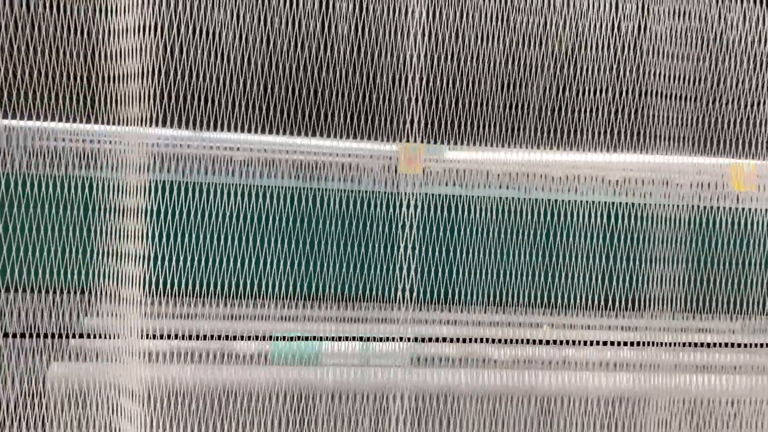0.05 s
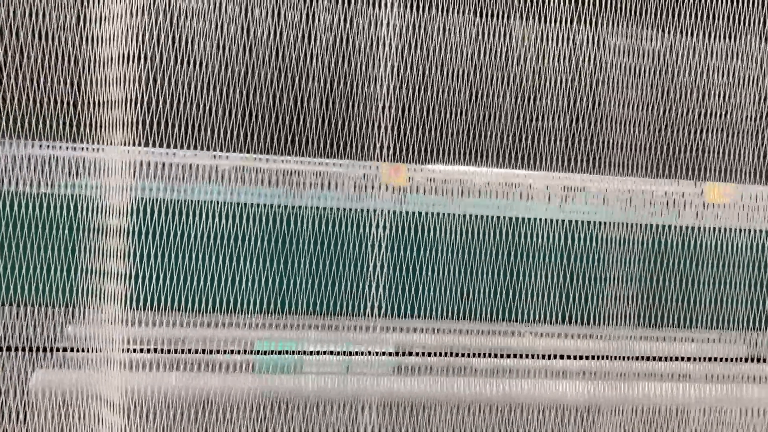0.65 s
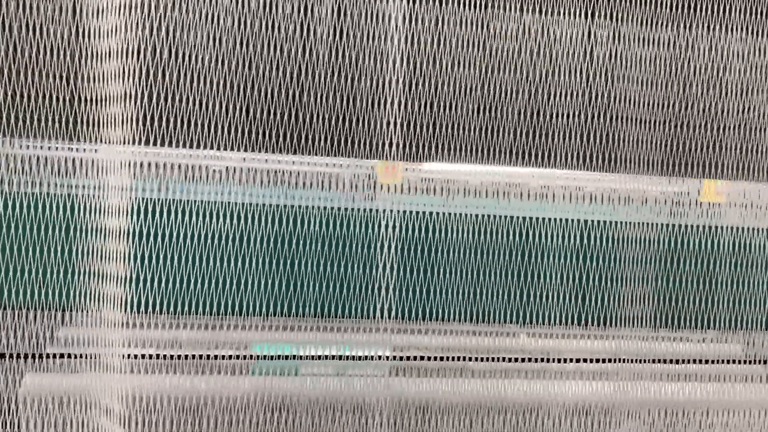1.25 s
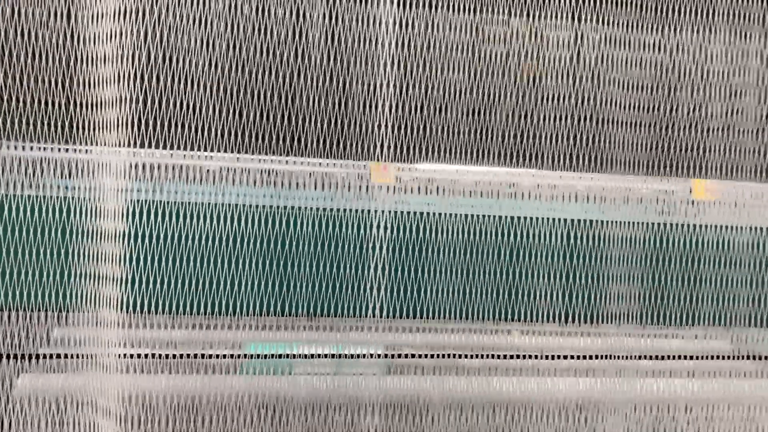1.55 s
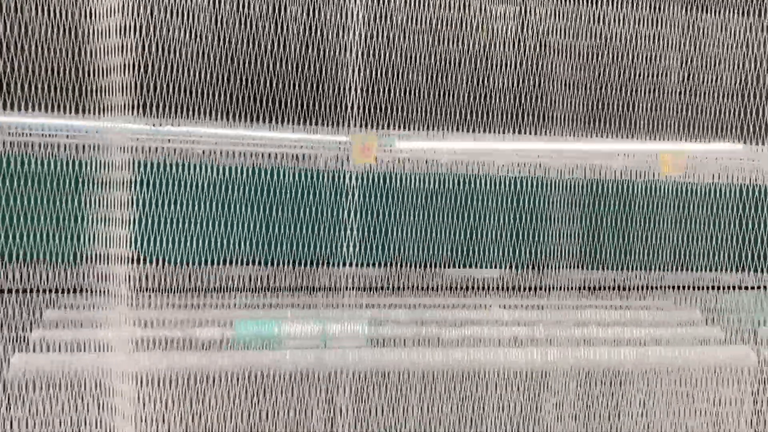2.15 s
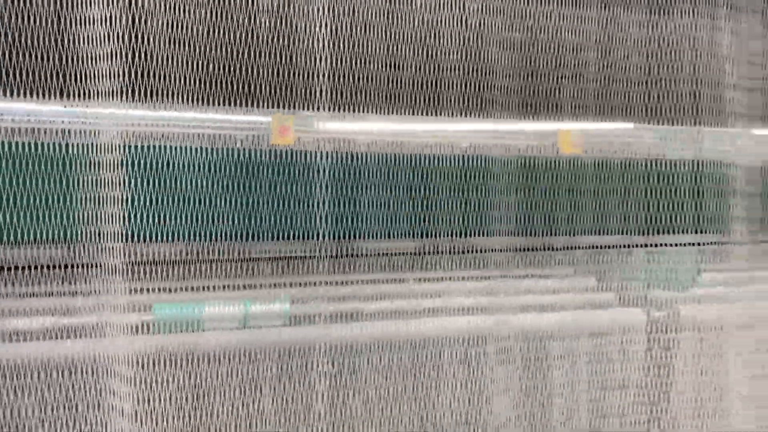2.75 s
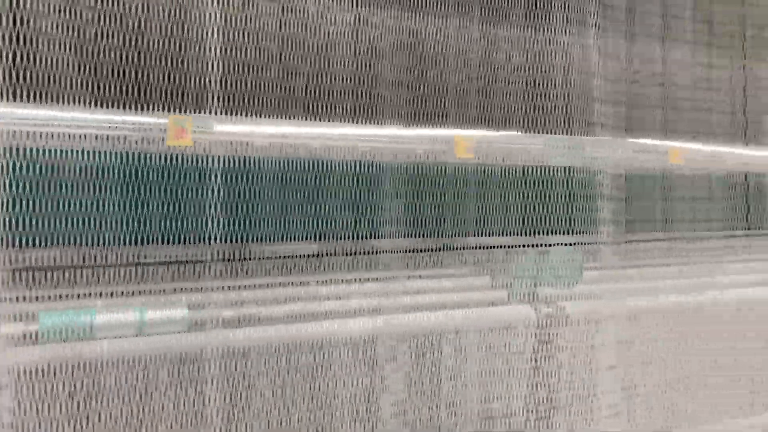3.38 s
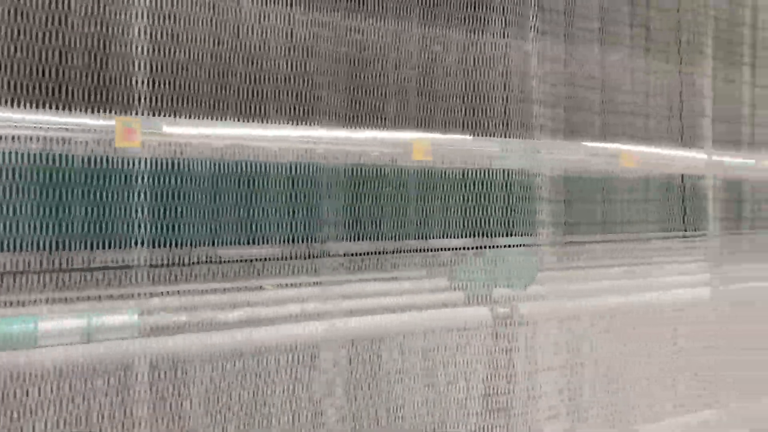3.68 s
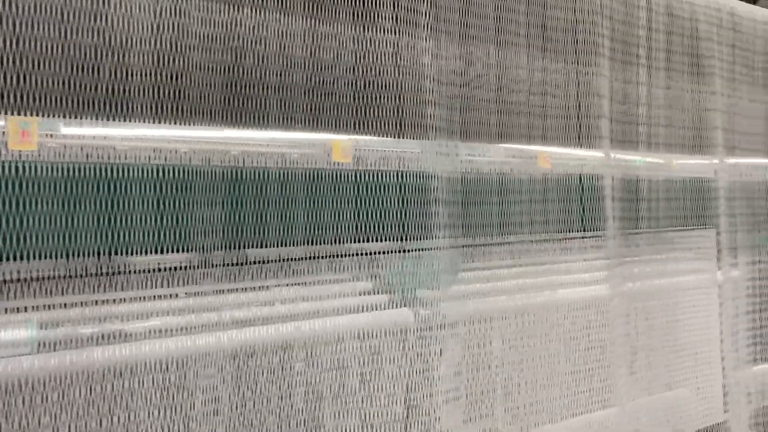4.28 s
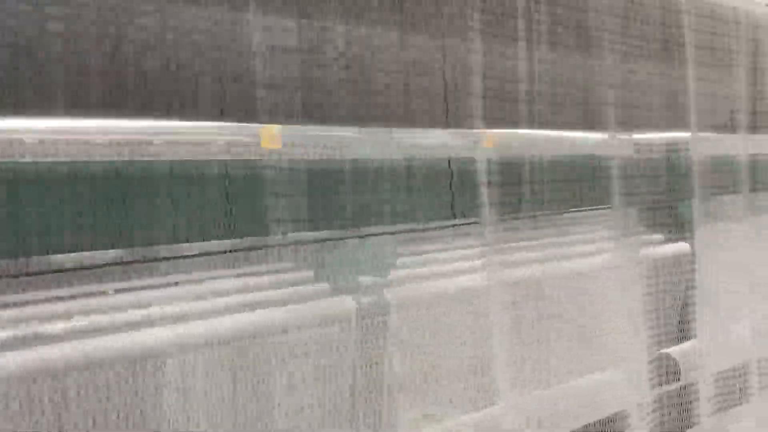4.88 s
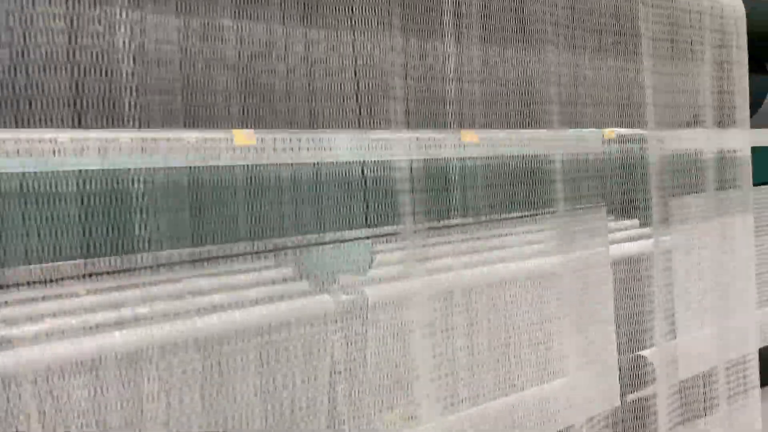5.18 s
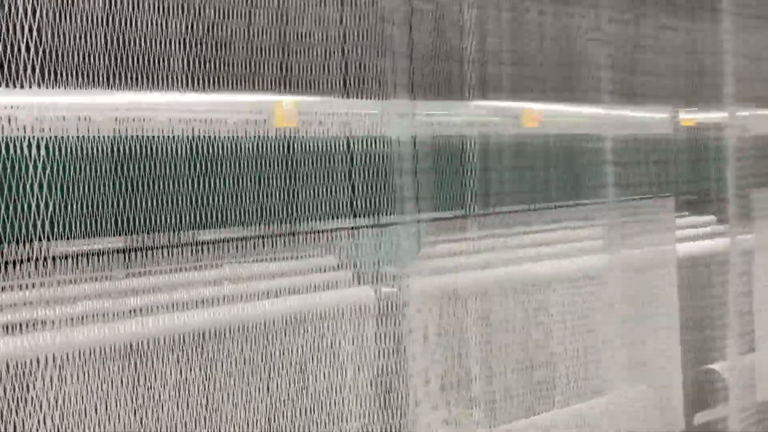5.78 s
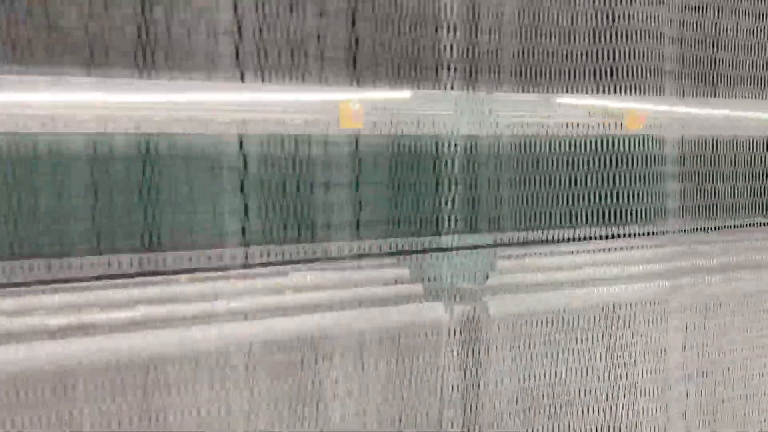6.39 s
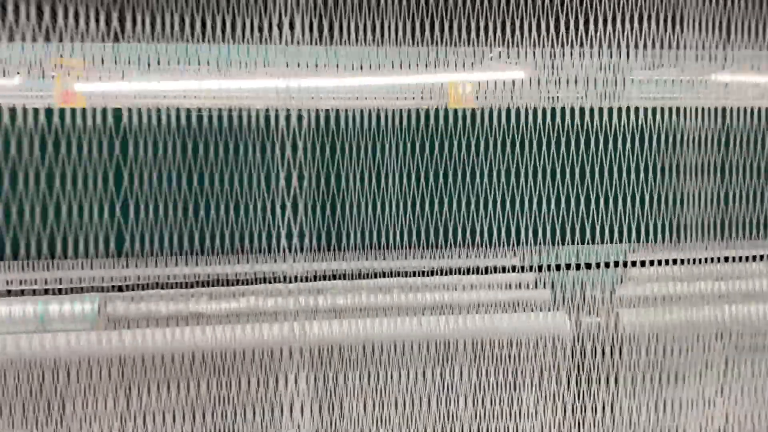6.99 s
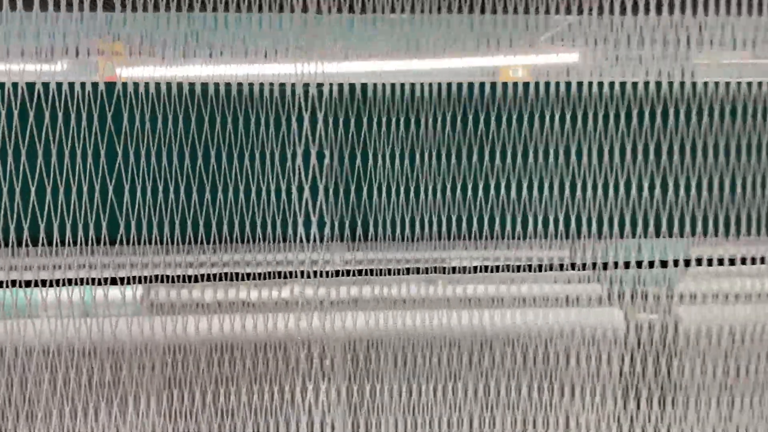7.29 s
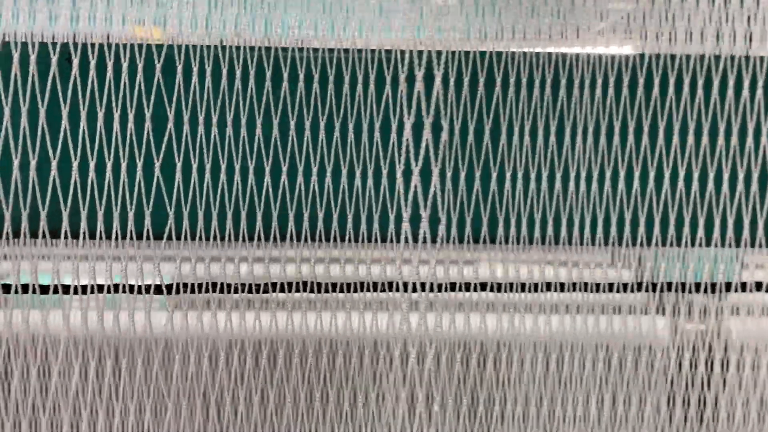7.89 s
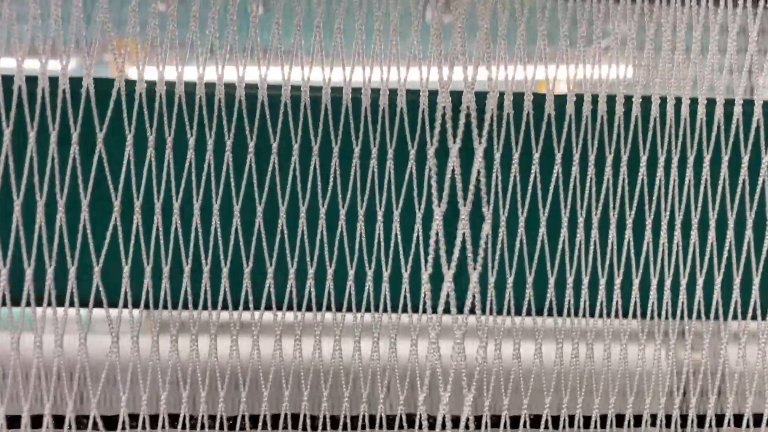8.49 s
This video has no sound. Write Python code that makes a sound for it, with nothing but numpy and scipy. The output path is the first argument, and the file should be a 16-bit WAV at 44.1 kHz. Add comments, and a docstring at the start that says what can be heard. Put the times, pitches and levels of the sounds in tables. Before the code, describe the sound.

A net-making machine clacks, ticks and thumps about three times a second over a dense factory roar with distant booms.

```python
"""In a factory hall, a wide net-making machine close by turns about three times a second.
In every turn latches tick, threads swish, bobbins chink, bars knock, a row of shuttles clacks home
and the frame thumps the floor. Now and then a dry guide scrapes or squeaks, or a loose part clinks.
Other machines roar all around, and heavy blows boom through the hall, some setting panels droning."""
import sys
import numpy as np
from scipy import signal
from scipy.fft import rfft, irfft, next_fast_len
from scipy.io import wavfile
from scipy.ndimage import map_coordinates

SR = 44100
rng = np.random.default_rng(int(sys.argv[2]) if len(sys.argv) > 2 else 0)


def int16_out(signal):
    """Quantize to a 16-bit WAV file."""
    q = np.round(np.clip(np.atleast_2d(signal).T, -1, 1) * 32767)
    wavfile.write(sys.argv[1], SR, q.astype(np.int16))


N = 385434
TIME = np.arange(N) / SR
TURN_S = .324637  # one turn of the crank


def amp(db):
    """Turn decibels into a gain."""
    return 10 ** (np.asarray(db) / 20)


def unit(x):
    """Scale a sound to an average (rms) level of 1."""
    return x / np.sqrt(np.mean(x ** 2) + 1e-20)


def along(points, hz):
    """Read (Hz, value) points at any frequency, on a log scale."""
    f, v = np.transpose(points)
    return np.interp(np.log(hz + 1), np.log(f + 1), v)


def curve(points):
    """Join (seconds, value) points with straight lines."""
    return np.interp(TIME, *np.transpose(points))


def wobble(rate):
    """A smooth random curve through `rate` points a second."""
    return map_coordinates(rng.standard_normal(int(N * rate / SR) + 4), [TIME * rate])


def filtered(x, response):
    """Give each frequency in x the gain response(hz)."""
    size = next_fast_len(N + 8192)
    return irfft(rfft(x, size) * response(np.fft.rfftfreq(size, 1 / SR)), size)[..., :N]


def rush(spectrum):
    """Noise from all around, nearly the same left and right in the bass."""
    # Each row: frequency in Hz, how alike the two sides are (1 is identical).
    likeness = [(60, 0.91), (130, 1), (290, 0.56), (640, 0.037), (1400, -0.16), (2300, 0.4), (4000, 0.78),
                (7000, 0.74)]
    angle = lambda hz: np.arccos(np.clip(along(likeness, hz), -1, 1)) / 2
    colour = lambda hz: amp(along(spectrum, hz)) * np.array([np.cos(angle(hz)), np.sin(angle(hz))])
    mid, side = filtered(rng.standard_normal((2, N)), colour)
    return unit(np.array([mid + side, mid - side]))


def nearby(spectrum, direct, sizes=1, left_lag_s=.00027):
    """Close noise: the direct share reaches the right side first, the rest is scattered."""
    noise = sizes * rng.standard_normal((3, N))
    common, *scattered = filtered(noise, lambda hz: amp(along(spectrum, hz)))
    straight = np.array([np.roll(common, round(left_lag_s * SR)), common])
    return unit(np.sqrt(direct) * straight + np.sqrt(1 - direct) * np.array(scattered))


def narrow(modes, width_hz):
    """Stereo noise that rings around the given (Hz, dB) pitches."""
    shape = lambda f: sum(amp(db) / (1 + ((f - hz) / width_hz) ** 2) for hz, db in modes)
    return unit(filtered(rng.standard_normal((2, N)), shape))


def contacts(spectrum, rate, spread_db, direct):
    """A shower of tiny, uneven impacts, about `rate` a second."""
    hits = rng.random(N) < rate / SR
    sizes = amp(spread_db * rng.standard_normal(N).clip(-2, 2))
    return nearby(spectrum, direct, hits * sizes)


def fade(t, t60):
    """Die away by 60 dB in t60 seconds, the fade time."""
    return np.exp(-np.log(1000) * t / t60)


def blows(rows, attack):
    """The loudness over time of (start, dB, fade time) blows, each rising in about `attack` seconds."""
    power = np.zeros(N)
    for s, db, t60 in rows:
        span = slice(*np.searchsorted(TIME, [s, s + t60]))
        t = TIME[span] - s
        power[span] += (amp(db) * fade(t, t60) * (1 - np.exp(-t / attack))) ** 2
    return np.sqrt(power)


def ping(s, db, t60, hz, attack):
    """One struck note: a sine that rises quickly and dies away."""
    return blows([(s, db, t60)], attack) * np.sin(2 * np.pi * hz * (TIME - s))


def turns(first_s=.0837, quicken_s=.0000656):
    """The time of each turn's stroke, when the shuttles land; the crank speeds up very slightly."""
    k = np.arange(-1, TIME[-1] / TURN_S + 1)
    return first_s + k * TURN_S - quicken_s * k ** 2 / 2


def accent(rows, s):
    """The extra dB of the turn whose stroke falls at s."""
    return sum(db for when, db in rows if abs(when - s) < TURN_S / 2)


def hall(level_db=11.5):
    """Many machines blur into one roar; it and the booms ring in the hall."""
    # The roar's tone. Each row: frequency in Hz, level in dB.
    roar_tone = [(20, -47), (55, 1.5), (90, 0.5), (125, -3.5), (200, -2), (290, -4), (350, -7), (480, -6),
                 (720, -5.5), (950, -9), (1200, -13.5), (2300, -20), (4500, -24), (9000, -45), (11000, -33),
                 (16000, -26.5)]
    # Its slow rise and fall. Each row: time in seconds, level in dB.
    roar_levels = [(0, -32.5), (1.2, -33), (2.1, -32.5), (3, -32.5), (4.3, -32.5), (5.2, -33.5),
                   (5.8, -33.5), (6.6, -34.5), (7.4, -34.5), (8.2, -33), (8.74, -35)]
    # Pitches the hall favours. Each row: frequency in Hz, half width in Hz, boost in dB.
    resonances = [(138.4, 14.6, 3.5), (208, 56, 2), (302, 6.6, 1.5), (407, 20, 3.5), (481, 3.2, 5),
                  (1390, 35, 1.5), (2410, 470, 2.5)]
    drift_db = .45 * wobble(6)
    roar = amp(curve(roar_levels) + level_db + drift_db) * rush(roar_tone)
    lift = lambda f: amp(sum(db / (1 + ((f - hz) / width) ** 2) for hz, width, db in resonances))
    air = lambda f: 1 / (1 + (f / 9000) ** 4)  # distance takes the treble away
    return filtered(roar + booms(), lambda f: lift(f) * air(f))


def threads(rattle_db=11, swish_db=2, rattle_depth=.72):
    """Threads swish and bobbins rattle, swelling with the crank; the slack varies from turn to turn."""
    # Faster threads are louder. Each row: share of the turn after the stroke, level in dB.
    pull = [(.02, 3), (.14, .7), (.28, -2.3), (.48, -3.7), (.62, -.8), (.8, .8), (.92, 1.8)]
    # How near the threads sound. Each row: time in seconds, level in dB.
    nearness = [(0, -44), (2.3, -43.5), (4.2, -44.5), (6.2, -42.5), (6.4, -49.5), (6.9, -45.5), (8.74, -45)]
    # The two tones. Each row: frequency in Hz, level in dB.
    rattle_tone = [(300, -45), (1000, 5.5), (1700, 10.5), (3000, 4), (4400, -7), (5400, -1.5), (7500, -4.5),
                   (12000, -136), (16000, -55)]
    swish_tone = [(2000, -12), (4500, 1), (6500, 2), (8500, -1), (11000, 1), (12500, 0), (16000, -5)]
    crank = np.interp(TIME, turns(), np.arange(len(turns())))
    pull_db = np.interp(crank, *np.transpose(pull), period=1)
    slack_db = .7 * wobble(14)
    rattle_gain = amp(rattle_db + rattle_depth * pull_db + 2 * wobble(70))
    rattle = rattle_gain * contacts(rattle_tone, rate=4000, spread_db=0, direct=.096)
    swish = amp(swish_db + pull_db + slack_db + .81 * wobble(120)) * nearby(swish_tone, direct=1)
    return amp(curve(nearness)) * (rattle + swish)


def bobbins(level_db=-43, centre_hz=2550, spread=.22, spread_db=4.5, t60=.13, count=1200):
    """Loose steel bobbins chink at random, each at its own pitch and place."""
    when, place = rng.random((2, count))
    pitch, size = rng.standard_normal((2, count, 1)).clip(-2, 2)
    t = np.arange(SR // 20) / SR
    hz = centre_hz * np.exp(spread * pitch)
    chinks = amp(spread_db * size) * fade(t, t60) * np.sin(2 * np.pi * hz * t)
    samples = ((when * N).astype(int)[:, None] + np.arange(len(t))).ravel()
    sides = [np.bincount(samples, (pan[:, None] * chinks).ravel(), N)[:N] for pan in (place, 1 - place)]
    return amp(level_db) * unit(np.array(sides))


def latches(level_db=-41, slop_s=.001, scatter_db=1, ring_db=-10):
    """The same steel latches trip in every turn, never quite equally hard."""
    # One turn's ticks. Each row: seconds from the stroke, level in dB, fade time in seconds.
    trips = [(-.1435, 6.5, .06), (-.1205, 7, .065), (-.0905, 10.5, .05), (-.08, -2, .16), (-.022, 0, .1),
             (-.005, 2, .07), (.018, -1, .07), (.093, -1.5, .1)]
    # Harder and softer turns. Each row: time in seconds, extra dB.
    accents = [(.41, -1.5), (.733, 2), (1.057, 1), (1.383, -1.5), (2.355, 1), (3.003, -5), (3.975, 1.5),
               (4.622, -3), (4.946, -3), (5.593, .5), (6.238, 2), (6.56, -2.5), (7.21, -3.5), (7.535, 1),
               (7.856, -3.5), (8.179, 0), (8.503, -2.5), (8.82, -3)]
    # The tick's tone and the steel's ring. Each row: frequency in Hz, level in dB.
    tick_tone = [(1500, -25), (3500, -10), (6500, -6), (8500, -7), (10500, 0), (12500, 0), (14000, -8),
                 (16000, -15)]
    steel_notes = [(10550, 2), (10930, 1), (12650, 0), (15520, -4)]
    ticks = []
    for s in turns():
        turn_db = level_db + accent(accents, s)
        ticks += [(s + lag + slop_s * rng.normal(), turn_db + db + scatter_db * rng.normal(), t60)
                  for lag, db, t60 in trips]
    steel = nearby(tick_tone, direct=1) + amp(ring_db) * narrow(steel_notes, width_hz=25)
    return blows(ticks, attack=.002) * steel


def frame(level_db=-1, floor_db=-1, floor_t60=.36, scatter_db=1.5, turn_scatter_db=.3):
    """As the heavy bars reverse they shove the frame, which rings low and shakes the floor."""
    # One turn's shoves. Each row: seconds from the stroke, level in dB.
    turn_shoves = [(-.117, -12), (-.049, -10), (0.028, -2), (0.061, -4), (0.088, -5), (.12, -2),
                   (.162, -15)]
    # The frame's ring. Each row: pitch in Hz, level in dB, fade time in seconds.
    notes = [(59.6, -15, 0.088), (80.8, 3.5, 1), (86.3, 7.5, 0.14), (150, 4, 0.034)]
    # The trembling floor. Each row: frequency in Hz, level in dB.
    floor_tone = [(20, -30), (38, -17), (52, 12), (66, 23), (79, 30), (92, 15), (110, -24), (200, -46)]
    # How near the frame sounds. Each row: time in seconds, level in dB.
    nearness = [(0, -24.5), (.5, -26.5), (1.3, -23), (2.6, -28.5), (4.1, -28), (5.2, -24), (6.6, -33),
                (7.6, -27), (8.74, -27.5)]
    t = np.arange(SR // 3) / SR
    ring = sum(amp(db) * np.sin(2 * np.pi * hz * t) * fade(t, t60) for hz, db, t60 in notes)
    shoves = []
    for s in turns():
        load_db = turn_scatter_db * rng.normal()
        shoves += [(s + lag, load_db + db + scatter_db * rng.normal())
                   for lag, db in turn_shoves if 0 <= s + lag < TIME[-1]]
    pushes = np.zeros(N)
    for s, db in shoves:
        pushes[int(s * SR)] = amp(level_db + db)
    low_cut = lambda hz: 1 - 1 / (1 + (hz / 42) ** 6)
    thumps = filtered(signal.fftconvolve(pushes, ring)[:N], low_cut)
    tremor = blows([(s, floor_db + db, floor_t60) for s, db in shoves], attack=.012) * rush(floor_tone)
    return amp(curve(nearness)) * (thumps + tremor)


def bars(level_db=-1):
    """The heavy bars give a dull, hollow knock each time they reverse."""
    # One turn's knocks. Each row: seconds from the stroke, level in dB, fade time in seconds.
    reversals = [(-.108, -27.5, .13), (-.055, -28, .15), (.008, -29, .1), (.026, -25.5, .11)]
    # Their tone. Each row: frequency in Hz, level in dB.
    tone = [(120, -4), (250, 4), (500, -2.5), (800, 4.5), (1100, -6), (1800, -8.5), (3000, -38),
            (6000, -60)]
    # How near the bars sound. Each row: time in seconds, level in dB.
    nearness = [(0, 0), (2.5, 8), (4.3, 8), (5.6, 8.5), (7.5, -1), (8.74, -2)]
    knocks = [(s + lag, db, t60) for s in turns() for lag, db, t60 in reversals]
    return amp(level_db + curve(nearness)) * blows(knocks, attack=.004) * rush(tone)


def shuttles(level_db=-29.3, ring_db=-3.5, ring_t60=.22, knock_t60=.086):
    """Hundreds of shuttles land almost together in every turn, and their steel rings on."""
    # A first touch, the clack's two edges, its echo and a small recoil.
    # Each row: seconds from the stroke, level in dB, fade time in seconds.
    landing = [(-.024, 2, .045), (-.0045, 7.3, .04), (.001, 7.7, .035), (.002, -5, .45), (.094, 1, .07)]
    # Harder and softer turns. Each row: time in seconds, extra dB.
    accents = [(.084, -1.5), (.733, .5), (1.057, -.5), (1.383, 2), (1.709, 3), (2.027, 2), (2.355, 3.5),
               (2.679, 3), (3.003, 2.2), (3.323, 2), (3.651, 2), (3.975, 1.5), (4.622, .5), (4.946, -2.5),
               (5.272, 2.5), (5.918, 3), (6.238, 4), (6.56, 2), (6.886, -2), (7.21, -1), (7.535, -5),
               (8.179, -.5), (8.503, 2.5)]
    # Clacks from a second machine nearby, off the beat of this one. Each row: start in seconds, level in dB.
    other_clacks = [(.181, -26), (.2366, -24), (1.925, -28), (2.5691, -21), (2.888, -25), (3.218, -22.5),
                    (4.524, -24)]
    # The clack's tone and the steel's ring. Each row: frequency in Hz, level in dB.
    clack_tone = [(300, -20), (1200, -4), (2400, 0), (3500, 0), (4600, -6), (6000, -14), (9000, -23),
                  (16000, -40)]
    steel_notes = [(2380, 6), (2620, 7), (3060, -4), (3520, 4), (3860, -1)]
    strokes = [(s, level_db + accent(accents, s)) for s in turns()]
    landings = [(s + lag, force_db + db, t60) for s, force_db in strokes for lag, db, t60 in landing]
    knocks = [(s, db, knock_t60) for s, db in other_clacks]
    # the impacts arrive directly and off the frame
    impacts = unit(contacts(clack_tone, rate=9000, spread_db=-.5, direct=.41) + rush(clack_tone))
    clacks = blows(landings + knocks, attack=.001) * impacts
    ringing = blows([(s, force_db + ring_db, ring_t60) for s, force_db in strokes], attack=.0039)
    return clacks + ringing * narrow(steel_notes, width_hz=25)


def jolts(pitch_hz=76, spread=.066, t60=.16):
    """Now and then the frame drops hard on the floor: a few deep swings, never at quite the same pitch."""
    # Each row: start in seconds, level in dB.
    drops = [(.115, -16), (.265, -18), (.43, -17), (.53, -13), (.745, -16.5), (1.09, -21), (1.475, -20),
             (1.8, -17.5), (2.035, -17.5), (2.38, -19), (2.63, -18), (2.765, -18), (3.012, -16),
             (3.685, -20), (5.058, -17), (5.358, -18), (7.605, -16.5), (8.265, -13), (8.32, -16)]
    return sum(ping(s, db, t60, pitch_hz * np.exp(spread * rng.normal()), attack=.006) for s, db in drops)


def booms(hall_t60=2.86):
    """Heavy, distant blows arrive only as the hall's echo: a soft rise and a long tail."""
    # Each row: start in seconds, level of the deep rumble in dB, level of the higher body in dB.
    hits = [(.19, -23.5, -21), (0.398, -30, -27), (2.34, -31, -26.5), (2.482, -21.5, -22.5),
            (2.65, -25, -29), (3.371, -21.5, -23), (3.5, -29, -23.5), (5.852, -20, -20.5),
            (6.197, -18, -13.5), (6.321, -29, -24.5), (6.55, -22.5, -36), (6.95, -24.5, -25.5)]
    # Hollow steel rings at the loudest blow. Each row: start in seconds, level in dB, fade in seconds.
    clangs = [(6.215, -19.5, 1.7), (6.315, -22, 1.8), (6.465, -22.5, 2.0)]
    # The three tones. Each row: frequency in Hz, level in dB.
    rumble_tone = [(30, -16), (70, -1.5), (110, -5.5), (145, -1), (200, -7), (290, -2.5), (400, -16.5),
                   (1200, -72)]
    body_tone = [(80, -18), (230, -3), (350, -6), (490, 4.5), (590, 6), (750, 0), (1150, -7), (2400, -14),
                 (4500, -27), (8000, -27), (12000, -101)]
    hollow_notes = [(205, 1), (255, -14), (402, 3), (484, 1.5), (520, 0.5), (595, -10), (755, 2.5)]
    clang = blows(clangs, attack=.02) * narrow(hollow_notes, width_hz=13)
    rumble = blows([(s, db, hall_t60) for s, db, _ in hits], attack=.014) * rush(rumble_tone)
    body = blows([(s, db, hall_t60) for s, _, db in hits], attack=.02) * rush(body_tone)
    return rumble + body + clang + panels()


def guides(squeak_hz=15540, squeak_t60=.21, grit_db=-3):
    """Bars catch and slip in dry guides, scraping on two metallic notes or squeaking very high."""
    # Each row: start in seconds, level in dB, fade time in seconds, lower and upper pitch in Hz.
    scrapes = [(.2, -31.5, 1.2, 4200, 4630), (0.701, -30, 0.4, 4280, 4600), (3.41, -31.5, 1.1, 4030, 4650),
               (3.57, -39, 1.0, 4050, 4700), (5.881, -37, 2.4, 4130, 4650), (6.869, -33.5, 1, 4080, 4500)]
    # A scrape's hiss. Each row: frequency in Hz, level in dB.
    grit_tone = [(1500, -26), (3300, 5), (4500, -0.5), (5300, 1), (6500, 2), (8000, -23), (16000, -26)]
    # Each row: start in seconds, level in dB.
    squeaks = [(1.355, -46), (1.66, -46), (1.754, -45), (4.565, -43), (5.525, -45), (6.4976, -41),
               (6.821, -33), (6.93, -40), (7.147, -44), (7.4734, -35), (7.587, -40), (7.8997, -44),
               (8.1422, -36), (8.2327, -42), (8.43, -43)]
    squeak_gain = blows([(s, db, squeak_t60) for s, db in squeaks], attack=.007)
    out = squeak_gain * narrow([(squeak_hz, 0)], width_hz=130)
    grit = amp(grit_db) * rush(grit_tone)
    judder = amp(1.4 * wobble(90))
    for s, db, t60, lower_hz, upper_hz in scrapes:
        ring = narrow([(lower_hz, 0), (upper_hz, 0)], width_hz=85)
        out += blows([(s, db, t60)], attack=.02) * judder * (ring + grit)
    return out


def panels(waver=.59, flutter_db=.5):
    """Some blows set big loose panels droning, each on one low, unsteady note."""
    # Each row: start in seconds, level in dB, fade time in seconds, pitch in Hz.
    drones = [(2.49, -21, .5, 165), (3.39, -19, .65, 148), (5.86, -17, .6, 140), (6.515, -21, .45, 176),
              (6.64, -22, .5, 162), (6.97, -28, 1.1, 145)]
    phase = waver * wobble(22)
    notes = sum(blows([(s, db, t60)], attack=.014) * np.sin(2 * np.pi * hz * TIME + phase)
                for s, db, t60, hz in drones)
    return amp(flutter_db * wobble(25)) * notes


def clinks(upper_ratio=1.045):
    """A loose steel part rings briefly on two close notes, the upper one half as strong."""
    # Each row: start in seconds, level in dB, fade time in seconds, lower pitch in Hz.
    taps = [(3.972, -25, .12, 3680), (4.008, -19, .14, 2050)]
    return sum(ping(s, db, t60, hz, attack=.002) + ping(s, db, t60, hz * upper_ratio, attack=.002) / 2
               for s, db, t60, hz in taps)


def scene():
    """The near machine and the hall, a little louder on the left."""
    # Each row: frequency in Hz, how much louder the left side is in dB.
    lean = [(60, 1.5), (110, 3.5), (200, 0.5), (380, 3), (700, 4.5), (1290, 1.5), (2380, 0.5), (4400, 5),
            (8120, -0.5), (15000, 0.5)]
    machine = shuttles() + bars() + threads() + bobbins() + clinks() + guides() + latches()
    mix = machine + frame() + jolts() + hall()
    return filtered(mix, lambda hz: amp(np.outer([1, -1], along(lean, hz)) / 2))


def record(dry):
    """Round off the tallest peaks and cut away the very highest treble."""
    ceiling, top_hz = .95, 15900
    rounded = dry / (1 + np.abs(dry / ceiling) ** 8) ** (1 / 8)
    return filtered(rounded, lambda hz: hz < top_hz)


dry = scene()
out = record(dry)
int16_out(out)
```